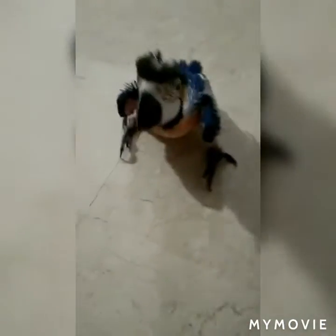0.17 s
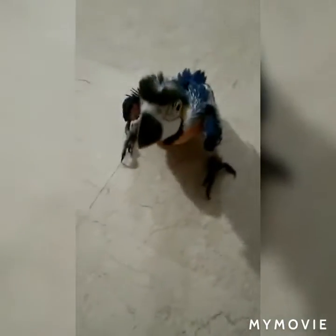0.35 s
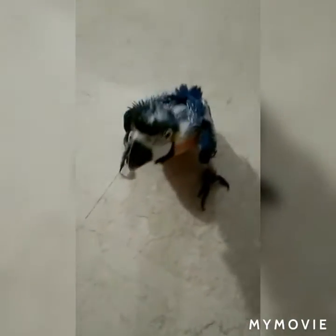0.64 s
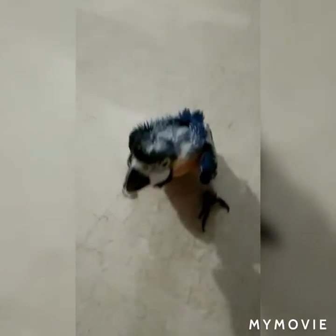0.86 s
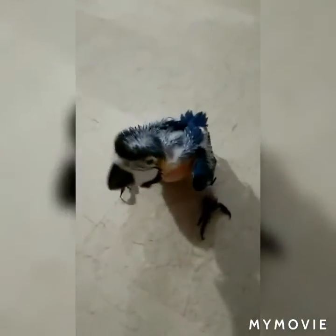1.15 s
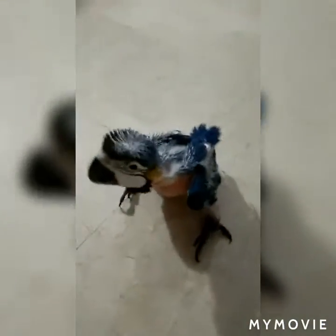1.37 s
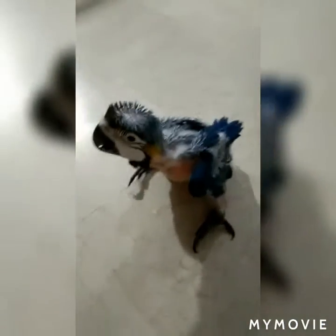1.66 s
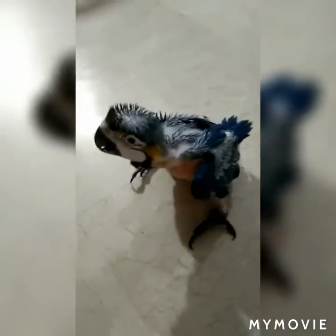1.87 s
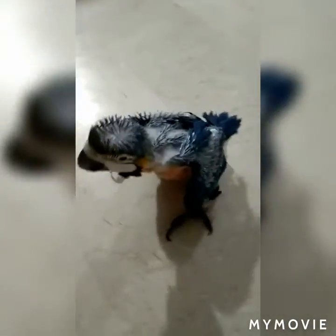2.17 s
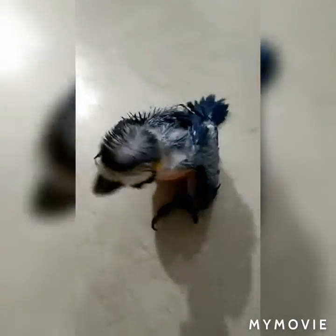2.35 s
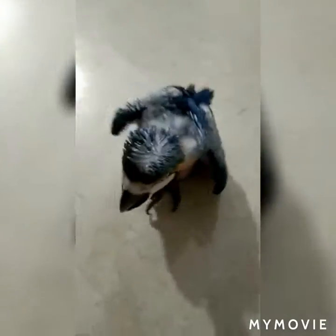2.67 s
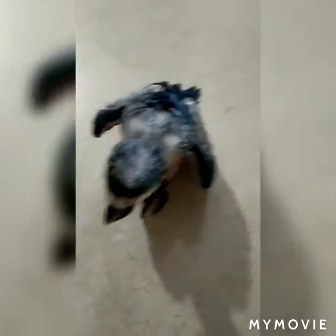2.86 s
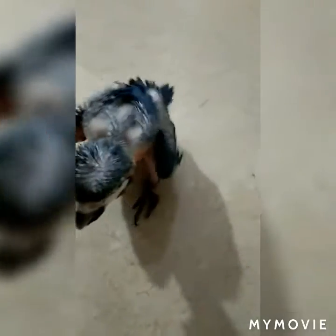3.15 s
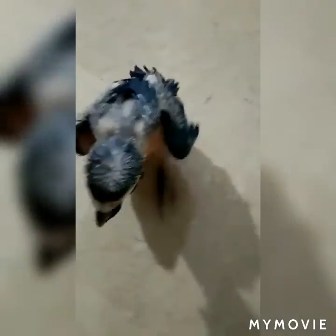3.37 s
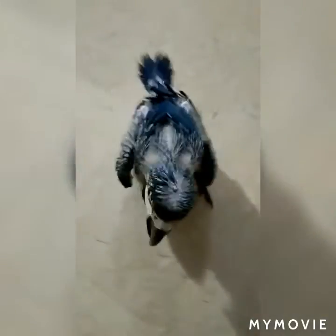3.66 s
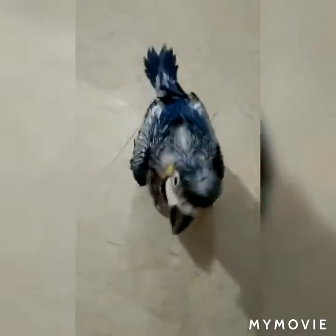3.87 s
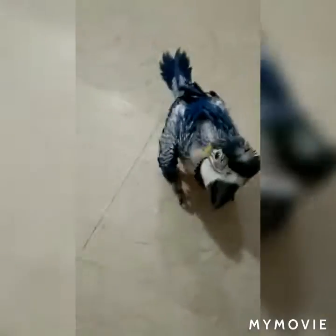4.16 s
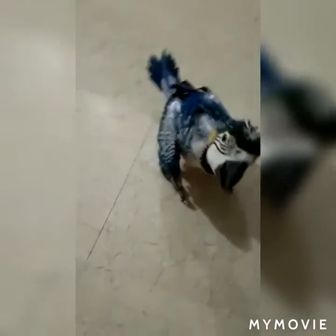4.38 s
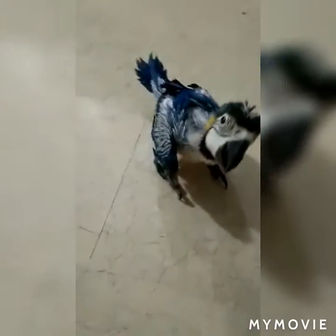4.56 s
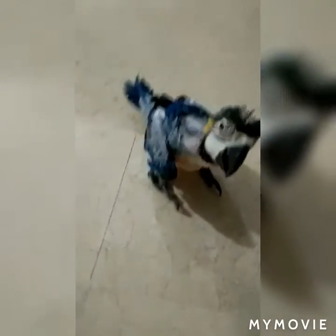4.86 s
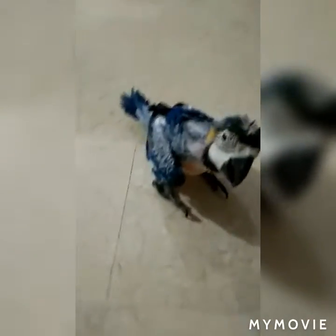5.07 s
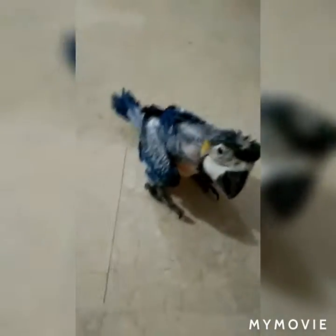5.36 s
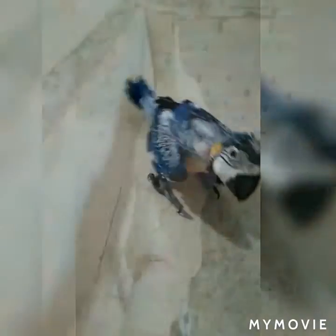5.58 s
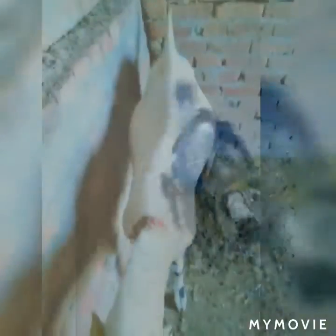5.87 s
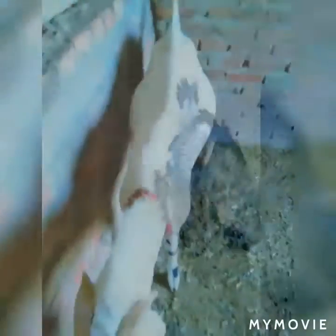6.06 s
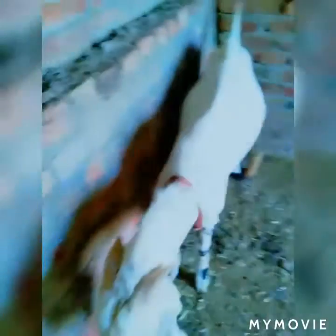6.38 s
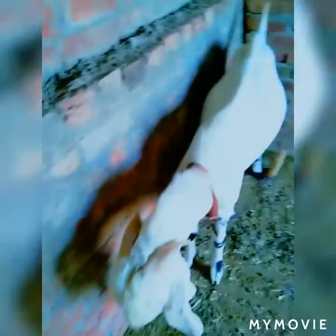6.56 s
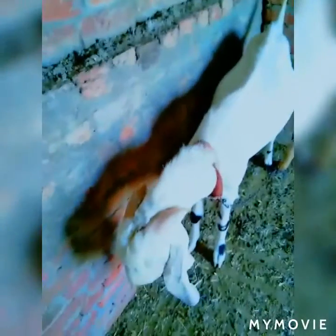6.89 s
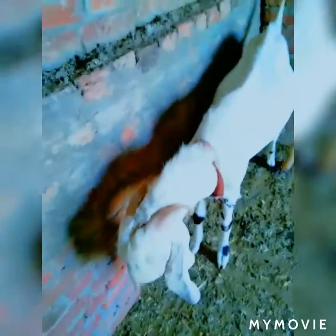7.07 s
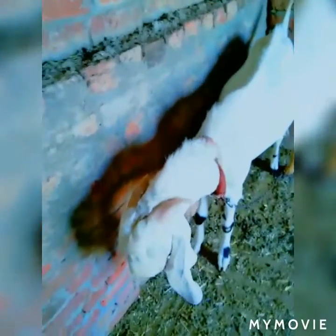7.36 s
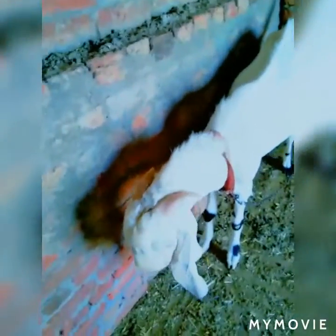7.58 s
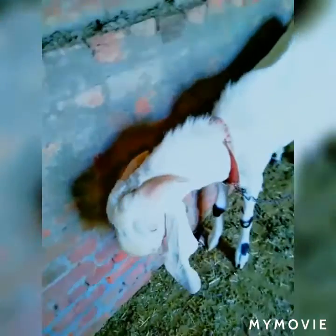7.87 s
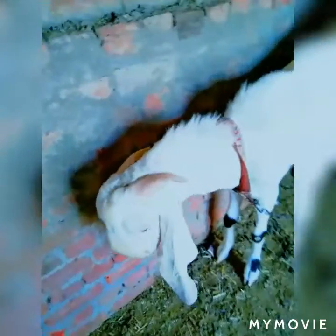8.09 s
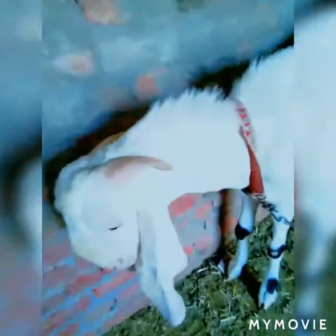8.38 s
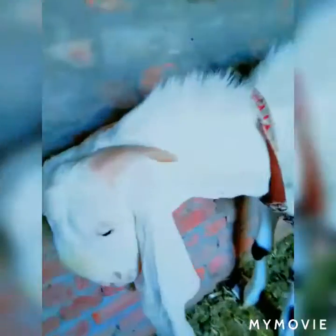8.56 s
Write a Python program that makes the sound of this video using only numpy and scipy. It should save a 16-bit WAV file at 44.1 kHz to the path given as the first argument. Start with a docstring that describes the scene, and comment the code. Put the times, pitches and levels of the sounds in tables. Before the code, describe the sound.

A close microphone in a hard-walled room catches harsh squawks in quick runs, each rasping and then tumbling down in pitch, joined by wavering screechy cries. Sharp claw clicks and dull footfalls punctuate them. The ringing echo is cut off abruptly; then faint small birds cheep, chatter and trill outdoors, with one tiny hollow knock over a soft rumbling background.

```python
"""Macaw chicks beg in a bare, echoing room: most squawks open as a rasp of slow throat pulses, then break
into shrill, mostly falling notes; one breaks straight into them. Long hoarse cries between the squawks layer
a wavering note with a noisy screech. Claws click as decaying noise and feet thump as decaying tones, over a
faint sine hum and still air. The sound then cuts to a quiet yard: gliding sines chirp and trill, gated noise
cheeps, filtered noise twitters as a flock farther off, and one hollow knock falls over a low rumble."""
import sys
import numpy as np
from scipy import signal
from scipy.fft import rfft, irfft, next_fast_len
from scipy.io import wavfile
from scipy.ndimage import uniform_filter1d, map_coordinates

SR = 44100
rng = np.random.default_rng(int(sys.argv[2]) if len(sys.argv) > 2 else 0)


def store_pcm(level_fs):
    """Save levels as 16-bit WAV."""
    pcm = np.round(np.clip(level_fs, -1, 1) * 32767).astype(np.int16)
    wavfile.write(sys.argv[1], SR, np.atleast_2d(pcm).T)


N = 384993

# Event levels are relative: each layer's own trim in dB is added where it is played.
# shrill notes of the squawks: [start t/s, end t/s, first f/Hz, last f/Hz, mid-note bow as a share of the pitch,
# fundamental level/dB, 2nd harmonic level/dB, 3rd harmonic level/dB]
SHRILL_NOTES = [(0.209, 0.337, 3105, 2390, -0.03, -22.5, -26.5, -36),
                (.322, .425, 2209, 1946, -0.026, -18.5, -32.5, -24),
                (.44, 0.492, 2050, 1202, 0.045, -26, -40.5, -44.5),
                (1.445, 1.602, 2882, 2390, 0.006, -32, -19, -55.5),
                (1.577, 1.643, 2295, 1796, -0.0075, -23.5, -49.5, -46.5),
                (1.699, 1.77, 1970, 1580, 0.027, -23, -51, -33.5),
                (2.812, 2.927, 3030, 2486, 0.0045, -21.5, -30, -52.5),
                (2.915, 2.987, 2294, 2000, -0.0054, -15.5, -59, -47),
                (3.939, 3.998, 2400, 2674, .005, -27, -20, -52),
                (3.99, 4.041, 2710, 2078, 0.026, -18.5, -28, -45),
                (4.056, 4.117, 2230, 1827, -0.0081, -23, -45.5, -35),
                (4.101, 4.2, 2214, 1246, 0.054, -18.5, -49, -37),
                (5.14, 5.24, 3200, 2590, -0.017, -23.5, -44, -44.5),
                (5.227, 5.251, 3254, 2766, 0.013, -19, -22, -51),
                (5.257, 5.312, 2575, 1936, -0.046, -20, -20, -24),
                (5.312, 5.379, 1973, 1482, -0.044, -28, -35, -34),
                (5.369, 5.454, 1357, 902, -0.0029, -38, -23.5, -28)]
# rasps that open most squawks: [start t/s, jump to upper register t/s, end t/s, level/dB, swell time t/s]
RASPS = [(.055, 0.192, .36, -21, 0.21), (1.303, 1.356, 1.47, -21.5, 0.11),
         (2.618, 2.725, 2.92, -21.5, 0.12), (5.125, 5.248, 5.25, -23, 0.096)]
# hoarse cries: [start t/s, end t/s, first f/Hz, last f/Hz, fundamental level/dB, 2nd harmonic level/dB,
# 3rd harmonic level/dB, screech level/dB]
CRIES = [(1.643, 1.80, 1171, 968, -47.5, -24.5, -42, -35.5),
         (1.751, 2.008, 905, 854.6, -47, -33, -33.5, -30),
         (1.978, 2.251, 2148, 2058, -38.5, -43, -32.5, -28.5),
         (2.277, 2.403, 1948, 1913, -29.5, -40, -40, -31.5),
         (2.381, 2.626, 2018, 2014, -35.5, -45.5, -54, -30.5),
         (3.01, 3.22, 2019, 1818, -22, -35, -37, -36.5), (3.724, 3.902, 1895, 1740, -33.5, -35, -38, -36.5),
         (3.844, 3.989, 1719, 1334, -35.5, -27.5, -33, -33),
         (3.95, 4.251, 1330, 1125, -49, -26, -52.5, -29),
         (4.242, 4.468, 1827, 1601, -32.5, -34.5, -46.5, -32),
         (4.341, 4.677, 1533, 1302, -49.5, -32, -50.5, -29.5)]
# throat colour with an open beak: [f/Hz, level/dB]
THROAT = [(450, -15), (620, -13), (1250, -1), (2900, 6), (4400, 1.5), (6200, 1.5), (7700, -9), (8800, -34),
          (15500, -59.5)]
# hoarse colour of a half-closed beak: [f/Hz, level/dB]
HOARSE = [(400, -61), (1230, -5.5), (1500, -5.5), (1950, -4.5), (2600, 7), (3300, -8.5), (6060, -8),
          (8990, -30.5), (15500, -62)]
# beak resonances that a note's overtones cross: [f/Hz, level/dB]
BEAK = [(1700, -4), (2500, 6), (3300, -9), (4000, 3), (4800, -3.5), (6200, 7), (7500, -6), (8700, -23),
        (12000, -27)]
# colour of the bright hiss: [f/Hz, level/dB]
HISS = [(4000, -25), (7500, 7.5), (13000, -5.5)]
# claws on the floor: [t/s, level/dB, extra knock level/dB]
TAPS = [(.556, -8.5, -10.5), (.568, -15.5, 6), (.795, -12.5, -16), (3.255, -16, -3.5), (3.453, -11.5, -16),
        (3.68, -10, -7.5), (3.768, -12.5, -4.5), (3.876, -11, -20), (3.972, -5.5, -16), (4.978, -25, -18.5)]
# colour of a claw's click on stone: [f/Hz, level/dB]
CLAW = [(1500, -10.5), (6300, 18), (8500, -8), (15000, -63.5)]
# footfalls: [t/s, level/dB, f/Hz]
STEPS = [(.798, -29.5, 470), (2.603, -25, 530), (2.868, -30, 448), (3.556, -39.5, 124.5), (3.873, -25, 402),
         (3.989, -19.5, 435), (5.137, -33.5, 500)]
# small birds' thin rising whistles: [t/s, level/dB]
CHIRPS = [(5.864, -46), (6.317, -47), (7.123, -47), (7.639, -51), (8.083, -46.5), (8.585, -49.5)]
# ends of a whistle's glide: [first f/Hz, last f/Hz]
CHIRP_HZ = (5420, 5700)
# small birds' wavering trills: [t/s, level/dB]
TRILLS = [(6.86, -56), (7.41, -53.5), (7.83, -54)]
# ends of a trill's glide: [first f/Hz, last f/Hz]
TRILL_HZ = (5500, 5330)
# small birds' short chatter notes: [t/s, f/Hz, level/dB]
CHATTER = [(5.829, 3480, -51), (6.06, 3660, -58.5), (6.335, 4500, -56.5), (7.039, 3280, -59.5),
           (7.262, 3240, -55), (8.059, 2880, -56)]
# small birds' harsh cheeps: [t/s, level/dB]
CHEEPS = [(5.827, -51), (5.948, -53), (6.35, -56.5), (6.784, -51), (7.675, -51.5)]
# colour of a buzzy cheep and of the flock: [f/Hz, level/dB]
FLOCK = [(1200, -32), (2600, 6), (3400, 10.5), (4500, 4.5), (5700, 7.5), (7300, 0), (10000, -40.5)]
# colour of the hollow knock in the yard: [f/Hz, level/dB]
KNOCK = [(150, -4.5), (400, -2), (2000, -11), (9000, -41)]
# colour of the still air indoors: [f/Hz, level/dB]
ROOM_AIR = [(25, -37), (110, -10), (450, -17), (6500, -31), (12000, -48)]
# colour of the yard's low rumble: [f/Hz, level/dB]
YARD_AIR = [(25, -24), (110, 2.5), (170, -8), (600, -16.5), (2800, -19), (7000, -26), (10000, -43.5)]
# decay of the bare room's echo: [f/Hz, time to fall 60 dB t/s]
WALLS = [(300, 3.5), (1500, 1.265), (6000, 1.56), (15000, 0.17)]
# decay of the yard's echo: [f/Hz, time to fall 60 dB t/s]
YARD = [(1000, 0.13)]

ROOM_ENDS, YARD_STARTS = 5.577, 5.628  # s
TOP_HZ = 15800
RASP_HZ, RASP_RISE_HZ_PER_S = 593.5, 130
UPPER_RASP_HZ, RASP_SAG_HZ_PER_S = 739.5, 120
RASP_SWELL_DB, RASP_FADE_DB_PER_S = 12, 21.5
ONSET_ROUGH, RASP_ROUGH, CRY_ROUGH = .48, .28, .2  # 0 clear, 1 hoarse
SCREECH_PATCHY_DB = 4.5
CRY_BOW = .008  # share of the pitch: a cry holds up before it sinks
HISS_S, HISS_LENGTH_S, HISS_DB = 1.65, 0.12, -40.5
CHIRP_S, TRILL_S, CHEEP_S, CHATTER_S = .078, 0.28, 0.1, 0.085  # lengths
WHISTLE_JITTER, TRILL_JITTER, CHATTER_JITTER = .014, .04, .055  # shares of the pitch
KNOCK_S, KNOCK_DB, KNOCK_T60 = 7.355, -43, 0.024  # start s, level, decay s


def amp(db):
    """Decibels to gain."""
    return 10 ** (np.asarray(db) / 20)


def unit(x):
    """Scale to rms 1."""
    return x / np.sqrt(np.mean(x ** 2) + 1e-20)


def noise(n):
    """White noise, n samples."""
    return rng.standard_normal(n)


def along(points, hz):
    """Read a curve of (Hz, value) points on a log frequency axis."""
    f, v = np.transpose(points)
    return np.interp(np.log(hz + 1), np.log(f + 1), v)


def filtered(x, response):
    """Shape x by a response given as a function of frequency."""
    m = next_fast_len(len(x) + 8192)
    spectrum = rfft(x, m) * response(np.fft.rfftfreq(m, 1 / SR))
    return irfft(spectrum, m)[:len(x)]


def coloured(x, spectrum):
    """Send x through a (Hz, dB) spectrum, at rms 1."""
    return unit(filtered(x, lambda hz: amp(along(spectrum, hz))))


def wobble(rate, n):
    """A smooth random curve of n samples, rate knots a second."""
    knots = noise(int(n * rate / SR) + 4)
    return map_coordinates(knots, [np.arange(n) * rate / SR])


def patchy(x, depth_db):
    """Resonances that come and go: a random gain, smooth over pitch and time."""
    z = signal.stft(x, nperseg=512)[2]
    field = uniform_filter1d(rng.standard_normal(z.shape), size=3, axis=0)
    field = uniform_filter1d(field, size=7, axis=1)
    return signal.istft(z * amp(depth_db * unit(field)), nperseg=512)[1][:len(x)]


def add(track, s, x):
    """Mix x into the track from time s."""
    part = track[max(round(s * SR), 0):][:len(x)]
    part += x[:len(part)]


def gesture(length, edge):
    """Progress 0-1 through a note, and its envelope with soft edges (both times in s)."""
    u = np.linspace(0, 1, max(round(length * SR), 256))
    to_edge = np.minimum(u, 1 - u) * length
    return u, np.sin(np.pi / 2 * np.clip(to_edge / edge, 0, 1))


def turning(hz):
    """Phase of an oscillator that follows a pitch."""
    return 2 * np.pi * np.cumsum(hz) / SR


def echo(x, decay):
    """Diffuse reflections from decaying noise; each frequency dies at its own speed."""
    hz, t, z = signal.stft(noise(3 * SR // 2), SR, nperseg=256)
    dying = z * amp(-60 * t / along(decay, hz)[:, None])
    tail = signal.istft(dying, SR, nperseg=256)[1]
    delayed = np.pad(tail / np.linalg.norm(tail), (round(.004 * SR), 0))
    return signal.fftconvolve(x, delayed)[:N]


def yard_rumble(air_db=-60.0):
    """Low-weighted noise whose level is slightly uneven."""
    return amp(air_db) * coloured(noise(N), YARD_AIR) * amp(wobble(25, N))


def room_air(air_db=-52.5):
    """Still air: soft, dark noise with slowly shifting patches."""
    return amp(air_db) * coloured(patchy(noise(N), 1.6), ROOM_AIR)


def hum(hum_db=-59, hum_hz=362.7):
    """An appliance's hum: one sine whose level drifts slowly."""
    return np.sqrt(2) * np.sin(2 * np.pi * hum_hz * np.arange(N) / SR) * amp(hum_db + wobble(0.67, N))


def lingering(ring_db=-38, ring_t60=3.2):
    """At the start the room still rings with an earlier cry: hoarse noise that dies away."""
    return coloured(noise(N), HOARSE) * amp(ring_db - 60 * np.arange(N) / SR / ring_t60)


def flock(flock_db=-64):
    """The blurred twitter of a distant flock: patchy bird-coloured noise that swells and sinks."""
    return amp(flock_db + 4.3 * wobble(5.8, N)) * coloured(patchy(noise(N), 2.9), FLOCK)


def hollow_knock():
    """A light, hollow knock: a short burst of low-weighted noise that decays fast."""
    t = np.arange(SR // 10) / SR
    return coloured(noise(len(t)), KNOCK) * amp(KNOCK_DB - 60 * t / KNOCK_T60)


def chirp(length, first, last, jitter, edge=0.016, jitter_rate=800):
    """One slurred, trembling, grainy whistle of rms 1."""
    u, gate = gesture(length, edge)
    slur = first + (last - first) * np.sin(np.pi / 2 * u)
    pitch = slur * (1 + jitter * wobble(jitter_rate, len(u)))
    grain = amp(4.5 * wobble(220, len(u)))
    return unit(np.sin(turning(pitch)) * gate * grain)


def cheep(edge=0.04):
    """A harsh, buzzy cheep: noise with a fast random flutter, coloured like the flock."""
    u, gate = gesture(CHEEP_S, edge)
    buzz = noise(len(u)) * amp(3.4 * wobble(351, len(u)))
    return gate * coloured(buzz, FLOCK)


def small_birds(whistle_db=-4.5, undertone_db=-8):
    """Thin whistles, trills, chatter and buzzy cheeps over the twitter of a flock farther off."""
    out = np.zeros(N)
    for s, db in CHIRPS:
        add(out, s, amp(db + whistle_db) * chirp(CHIRP_S, *CHIRP_HZ, WHISTLE_JITTER))
    for s, db in TRILLS:
        trill = chirp(TRILL_S, *TRILL_HZ, TRILL_JITTER)
        undertone = amp(undertone_db) * chirp(TRILL_S, *np.divide(TRILL_HZ, 2.1), TRILL_JITTER)
        add(out, s, amp(db + whistle_db) * (trill + undertone))
    for s, hz, db in CHATTER:
        add(out, s, amp(db) * chirp(CHATTER_S, hz, hz, CHATTER_JITTER))
    for s, db in CHEEPS:
        add(out, s, amp(db) * cheep())
    return out + flock()


def claw_tap(t, knock_extra_db, tick_t60=0.019, knock_t60=0.057, tick_db=-6, knock_db=-7):
    """A hard contact: a bright tick and a duller knock, each a decaying noise burst."""
    knock_colour = [(60, -21), (700, -2.5), (2100, 7.0), (11000, -56.5)]  # Hz, dB
    tick = coloured(noise(len(t)), CLAW) * amp(tick_db - 60 * t / tick_t60)
    knock = coloured(noise(len(t)), knock_colour) * amp(knock_db + knock_extra_db - 60 * t / knock_t60)
    return (tick + knock) * (1 - np.exp(-t / .0005))


def footfall(t, hz, thump_t60=0.11, thump_db=-6):
    """A soft foot lands: a decaying tone inside a hump of noise around the same pitch."""
    hump = [(hz / 10, -32), (hz / 3, -6), (hz, 0), (2 * hz, -7), (10 * hz, -58)]  # Hz, dB
    thud = 0.99 * np.sin(2 * np.pi * hz * t) + coloured(noise(len(t)), hump)
    return thud * amp(thump_db - 60 * t / thump_t60) * (1 - np.exp(-t / 0.0012))


def feet():
    """Claws click and knock on the hard floor; soft feet land with a dull thump."""
    out, t = np.zeros(N), np.arange(SR // 5) / SR
    for s, db, knock_extra_db in TAPS:
        add(out, s, amp(db) * claw_tap(t, knock_extra_db))
    for s, db, hz in STEPS:
        add(out, s, amp(db) * footfall(t, hz))
    return out


def bright_hiss():
    """A short, airy hiss swells and dies above the voice."""
    out = np.zeros(N)
    u, gate = gesture(HISS_LENGTH_S, HISS_LENGTH_S / 2)
    add(out, HISS_S, amp(HISS_DB) * gate ** 2 * coloured(noise(len(u)), HISS))
    return out


def sinking(start, end, first, last, bow):
    """Pitch as the air runs out: drops at once and settles (bow < 0) or holds up, then plunges (bow > 0)."""
    u = np.linspace(0, 1, max(round((end - start) * SR), 256))
    return (first + (last - first) * u) * (1 + bow * (1 - (2 * u - 1) ** 2))


def shrill_note(pitch, levels, rough, jitter=.07, jitter_rate=450, shimmer_db=9, flutter_rate=260,
                fall_db=-4.0, edge_share=0.086):
    """The syrinx locks into a note; overtones swell across the beak's resonances, membranes flutter."""
    n = len(pitch)
    _, gate = gesture(n / SR, edge_share * n / SR)
    phase = turning(pitch * (1 + jitter * rough * wobble(jitter_rate, n)))
    tone = amp(levels[0]) * np.sin(phase)
    for k in range(2, 9):
        resonance = amp(along(BEAK, k * pitch))
        if k <= len(levels):
            drive = amp(levels[k - 1]) / np.sqrt(np.mean(resonance ** 2))
        else:
            # above the third harmonic each drive is a step weaker than the last
            drive = drive * amp(fall_db)
        flicker = amp(k / 2 * wobble(flutter_rate / 2, n))
        overtone = np.sin(k * phase) * (k * pitch < TOP_HZ)
        tone = tone + drive * resonance * flicker * overtone
    # air escapes in one puff a cycle
    puffs = noise(n) * (1 + np.cos(phase))
    hiss = coloured(puffs, HOARSE) * np.std(tone) * rough
    shimmer = amp(shimmer_db * rough * wobble(flutter_rate, n))
    return np.sqrt(2) * (tone + hiss) * gate * shimmer


def rasp(pitch, rough, jitter=0.0616, jitter_rate=380, shimmer_db=2, flutter_rate=110, patchy_db=3, edge=0.024):
    """Slow, uneven pulses ring the throat; at full roughness they break down into a hoarse screech."""
    n = len(pitch)
    _, gate = gesture(n / SR, edge)
    phase = turning(pitch * (1 + jitter * rough * wobble(jitter_rate, n)))
    pulses = np.zeros(n)
    for k in range(1, 24):
        # the tongue and beak never hold still: each overtone swells and fades on its own
        swell = amp(patchy_db * wobble(17.7, n))
        pulses += swell * np.cos(k * phase + 2 * np.pi * rng.random()) * (k * pitch < TOP_HZ)
    chaos = patchy(noise(n) * (1 + np.cos(phase)), SCREECH_PATCHY_DB)
    share = np.clip(rough, 0, 1) ** 2
    voice = np.sqrt(1 - share) * coloured(pulses, THROAT) + np.sqrt(share) * coloured(chaos, HOARSE)
    return voice * gate * amp(shimmer_db * wobble(flutter_rate, n))


def cries(note_db=-1, screech_rough=.74, tone_fade_db=8, screech_fade_db=5, waver_db=2, waver_rate=35,
          waver_share=0.0046, edge_share=0.22):
    """A long, wavering note and a screech share one sinking pitch; the note fades more steeply."""
    out = np.zeros(N)
    for start, end, first, last, *levels, screech_db in CRIES:
        pitch = sinking(start, end, first, last, CRY_BOW)
        pitch = pitch * (1 + waver_share * wobble(waver_rate, len(pitch)))
        fade = np.linspace(.5, -.5, len(pitch))
        tone_level = note_db + tone_fade_db * fade + waver_db * wobble(waver_rate, len(pitch))
        tone = amp(tone_level) * shrill_note(pitch, levels, CRY_ROUGH)
        screech = rasp(pitch, screech_rough, edge=edge_share * (end - start))
        add(out, start, tone + amp(screech_db + screech_fade_db * fade) * screech)
    return out


def opening_rasps(lower_db=-1, upper_db=-1.5, yield_db_per_s=70):
    """A low rasp swells from a rough start; the other side of the syrinx joins higher and takes over."""
    out = np.zeros(N)
    for start, jump, end, db, attack in RASPS:
        t = np.arange(round((end - start) * SR)) / SR
        late = np.maximum(t - (jump - start), 0)  # time since the jump
        rough = np.interp(t, [0, attack / 2], [ONSET_ROUGH, RASP_ROUGH])
        lower_pitch = RASP_HZ + RASP_RISE_HZ_PER_S * (t - late)
        lower = amp(lower_db - yield_db_per_s * late) * rasp(lower_pitch, rough)
        upper_gain = amp(upper_db - RASP_FADE_DB_PER_S * late) * np.minimum(late / .01, 1)
        upper = upper_gain * rasp(UPPER_RASP_HZ - RASP_SAG_HZ_PER_S * late, rough)
        swell = np.interp(t, [0, attack], [-RASP_SWELL_DB, 0])
        add(out, start, amp(db + swell) * (lower + upper))
    return out


def squawks(note_db=-.5, note_rough=0.18, fade_db_per_s=20):
    """Most squawks open as a rasp; one breaks straight into shrill notes. The notes mostly fall."""
    out = opening_rasps()
    for start, end, first, last, bow, *levels in SHRILL_NOTES:
        pitch = sinking(start, end, first, last, bow)
        fade = fade_db_per_s * (end - start) * np.linspace(.5, -.5, len(pitch))
        add(out, start, amp(note_db + fade) * shrill_note(pitch, levels, note_rough))
    return out


def yard(wet_db=-5):
    """Small birds and one knock with a short echo, over an uneven low rumble."""
    near = small_birds()
    add(near, KNOCK_S, hollow_knock())
    return near + amp(wet_db) * echo(near, YARD) + yard_rumble()


def room(steps, wet_db=-7.5, wall_db=-10, wall_delay=.021, feet_wet_db=-14):
    """The chicks between bare walls, with the echo of their feet, still air and a hum."""
    voice = squawks() + cries() + bright_hiss()
    # the nearest wall returns a falling note late, so higher: the two beat
    wall = amp(wall_db) * filtered(voice, lambda hz: np.exp(-2j * np.pi * hz * wall_delay))
    reflections = echo(amp(wet_db) * voice + amp(feet_wet_db) * steps, WALLS)
    return voice + wall + reflections + lingering() + hum() + room_air()


def scene(opening_db=-8, opening_time=0.78):
    """The room, an instant of silence, then the yard swells in; both channels alike."""
    t, steps = np.arange(N) / SR, feet()
    swell = np.interp(t - YARD_STARTS, [0, opening_time], [opening_db, 0])
    indoors = room(steps) * (t < ROOM_ENDS)
    outdoors = yard() * (t > YARD_STARTS) * amp(swell)
    mono = steps + indoors + outdoors
    return np.array([mono, mono])


def record(dry):
    """Nothing passes above the band limit."""
    return np.array([filtered(channel, lambda hz: hz < TOP_HZ) for channel in dry])


dry = scene()
out = record(dry)
store_pcm(out)
```